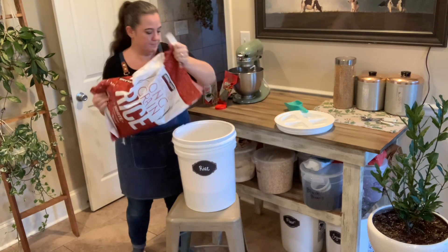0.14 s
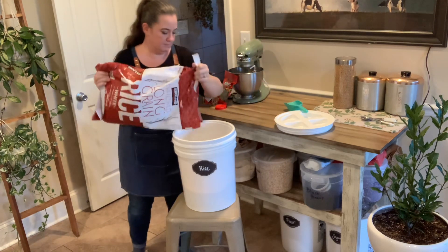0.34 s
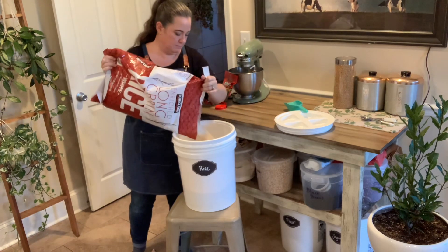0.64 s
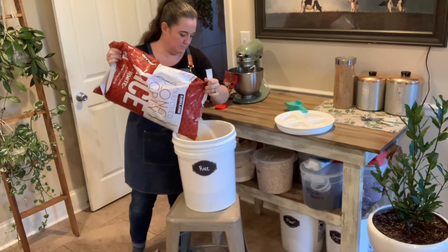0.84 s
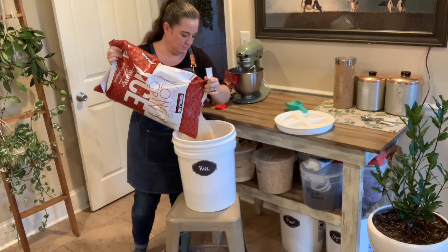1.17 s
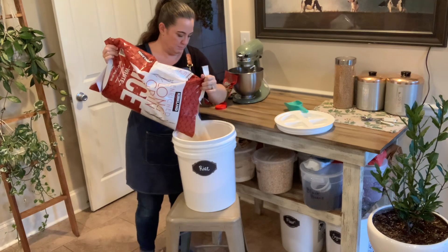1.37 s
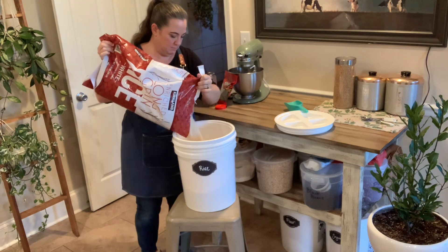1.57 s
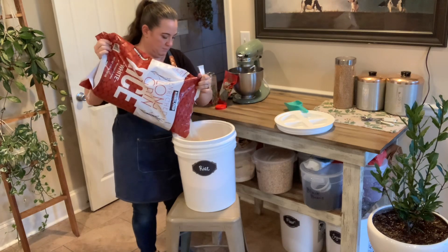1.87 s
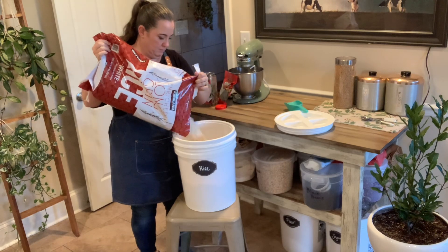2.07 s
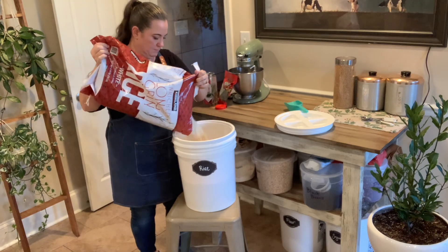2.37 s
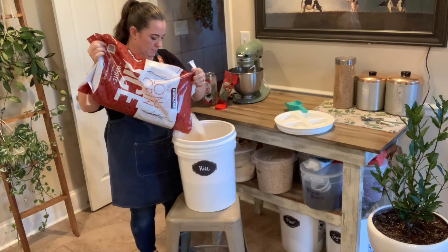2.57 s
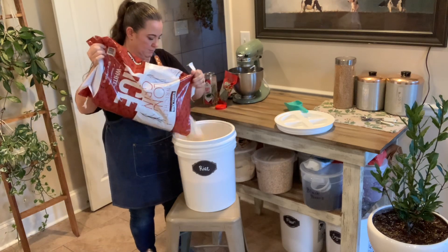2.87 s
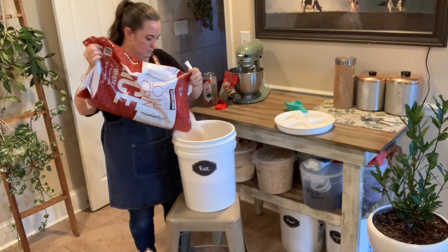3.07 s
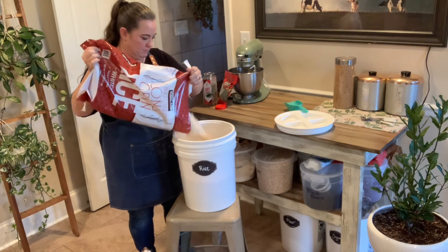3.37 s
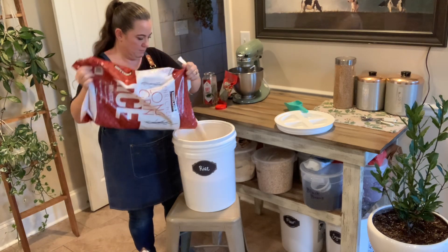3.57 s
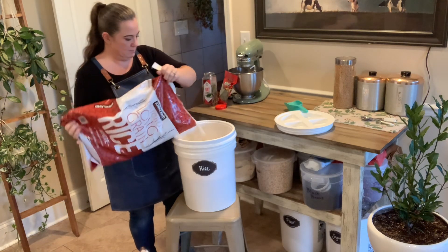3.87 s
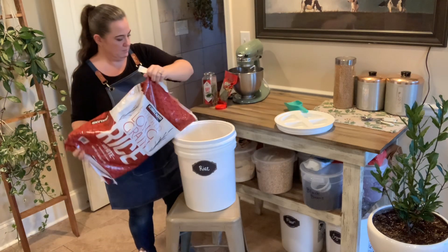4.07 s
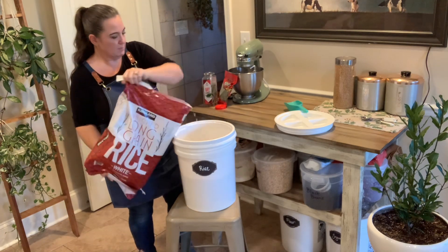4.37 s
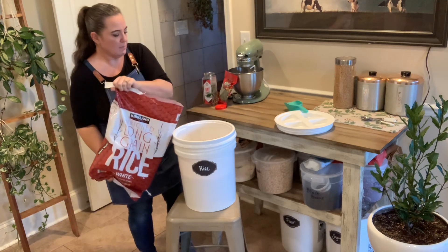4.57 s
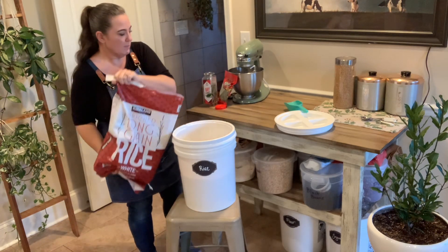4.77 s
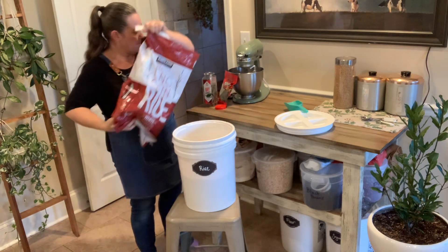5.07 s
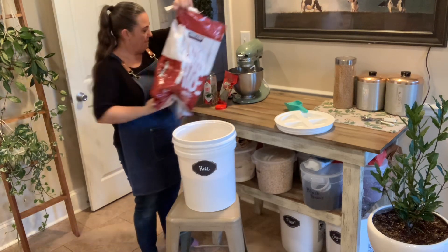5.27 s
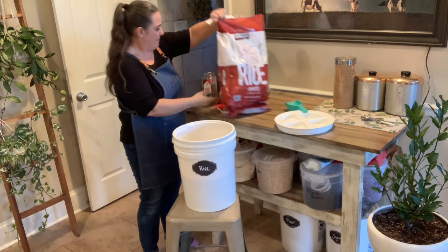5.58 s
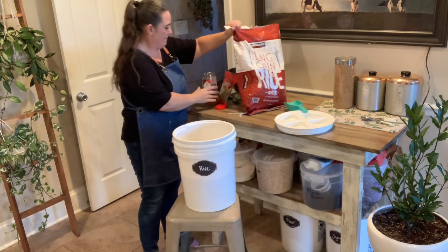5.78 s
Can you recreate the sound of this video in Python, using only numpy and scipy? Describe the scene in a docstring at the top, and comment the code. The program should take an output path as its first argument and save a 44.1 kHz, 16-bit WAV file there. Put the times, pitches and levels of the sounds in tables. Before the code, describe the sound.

In a kitchen with little echo and a steady low appliance hum, a sack of rice crunches and bumps close to the microphone. Grains patter into a plastic bucket, first as a stream, then in quick rhythmic spurts as the sack is shaken. The pouring stops, the rice slides back inside with loud crackles and snaps of the sack, and it lands with a few dull bumps.

```python
"""A rush of dry rice slides and crunches in a large woven sack, over a kitchen appliance's low hum. The sack
creases, snaps and bumps as the rice is shaken into a plastic bucket. Countless random impacts merge into noise:
grains patter on the heap, and the mass slides and slumps with every shake. Creases excite the sack's damped
modes, and the falling stream those of the bucket wall. In the stereo image the treble is nearly alike in both
channels, with a phase difference that turns with frequency."""
import sys
import numpy as np
from scipy import signal
from scipy.fft import rfft, irfft, next_fast_len
from scipy.io import wavfile

SR = 44100
rng = np.random.default_rng(int(sys.argv[2]) if len(sys.argv) > 2 else 0)


def wrap_up_sound(samples):
    """Save the sound to the file named by the first command line argument, as 16-bit audio."""
    columns = np.atleast_2d(samples).T
    # keep every value between -1 and 1, then stretch to whole-number steps
    tamed = np.clip(columns, -1, 1)
    steps = np.round(tamed * 32767).astype(np.int16)
    wavfile.write(sys.argv[1], SR, steps)


N = 261204
PADDED = next_fast_len(N + SR // 2, True)
BINS_HZ = np.arange(PADDED // 2 + 1) * SR / PADDED + 1e-3
CRUNCH_HOLD_S = .014

# rice creeping in the sack between moves: (time [s], slide level [dB], crunch level [dB])
CREEP = [(0, -29.5, -45), (.2, -37.5, -34.5), (.42, -33.5, -33), (.76, -33.5, -36.5), (1.12, -39, -45.5),
         (1.45, -46, -50), (1.66, -46.5, -50), (2.2, -44, -43.5), (2.48, -44, -39.5), (2.74, -52, -44),
         (3.45, -39, -40), (3.71, -45, -52), (4.0, -37.5, -40.5), (4.63, -35.5, -39.5), (5.0, -45.5, -38),
         (5.4, -45.5, -48.5), (5.5, -40.5, -44), (5.8, -38.5, -39), (5.92, -59, -44.5)]


def from_db(db):
    """Amplitude ratio: a factor of ten for every 20 dB."""
    return 10 ** (np.asarray(db) / 20)


def rms_one(x):
    """Normalisation to unit mean power."""
    return x / np.sqrt(np.mean(x ** 2) + 1e-20)


def level(rows, column=1):
    """Gain envelope: straight lines in dB give exponential growth and decay."""
    rows = np.array(rows)
    return from_db(np.interp(np.arange(N) / SR, rows[:, 0], rows[:, column]))


def at_hz(rows, hz, column=1):
    """Interpolation on a logarithmic frequency axis."""
    rows = np.array(rows)
    return np.interp(np.log(hz), np.log(rows[:, 0]), rows[:, column])


def drift(rate_hz):
    """Slow random modulation of unit rms: noise through two one-pole low-passes."""
    step, settle = 40, 2000
    pole = np.exp(-2 * np.pi * rate_hz * step / SR)
    noise = rng.standard_normal(N // step + settle + 2)
    slow = signal.lfilter([1], [1, -2 * pole, pole * pole], noise)[settle:]
    return np.interp(np.arange(N) / step, np.arange(len(slow)), rms_one(slow))


def grains(per_s, spread_db):
    """Shot noise: two independent Poisson streams of impacts of uneven size."""
    sizes = from_db(spread_db * np.minimum(rng.exponential(1, (2, N)), 4))
    signs = rng.choice([-1, 1], (2, N))
    return sizes * signs * (rng.random((2, N)) < per_s / SR) + 1e-9


def coloured(source, colour, patchy_db, flicker_hz):
    """Spectral shaping to unit rms, with partly correlated modulation of half-octave bands."""
    lowest, highest = colour[0][0], colour[-1][0]
    centres = lowest * 2 ** np.arange(0, np.log2(highest / lowest) + .5, .5)
    shaped = rfft(source, PADDED) * from_db(at_hz(colour, BINS_HZ))
    out, together = 0, drift(flicker_hz)
    for centre in centres:
        away = np.clip(2 * np.log2(BINS_HZ / centre), -1, 1)
        band = irfft(shaped * np.cos(np.pi / 2 * away) ** 2, PADDED)[:, :N]  # overlaps add up to one
        out = out + band * from_db(patchy_db * (.82 * together + drift(flicker_hz)))
    return rms_one(out)


def ring(clicks, hz, t60):
    """Damped resonator: a unit impulse starts a unit sine that falls 60 dB in t60 seconds."""
    r, w = from_db(-60 / (t60 * SR)), 2 * np.pi * hz / SR
    return signal.lfilter([0, np.sin(w)], [1, -2 * r * np.cos(w), r * r], clicks + 1e-18)


def surges(rows):
    """Summed power of exponential swells; each rise time and fall time spans 20 dB."""
    t = np.arange(0, N + 64, 64) / SR
    peak, rise, hold, fall, db = np.transpose(rows)[:, :, None]
    before = np.maximum((peak - t) / rise, 0)
    after = np.maximum((t - peak - hold) / fall, 0)
    power = from_db(db - 20 * (before + after)) ** 2
    return np.interp(np.arange(N) / SR, t, power.sum(axis=0))


def stirred(layer, *steady, shake_db=0, shift_db=0, lag=0, rise=.036, hold=.012):
    """Incoherent addition: a layer's steady parts and the sack's movements sum in power to one gain."""
    # shakes, about four a second: (peak time [s], fall [s], patter, slide, crunch, slump levels [dB])
    shakes = [(1.5, 0.092, -44, -38, -39.5, -43), (1.758, 0.13, -37, -35, -45, -49),
              (2.023, 0.15, -35.5, -33, -35.5, -43), (2.275, 0.25, -39.5, -34.5, -37, -43.5),
              (2.535, 0.23, -40, -32, -33.5, -39.5), (2.801, 0.23, -34.5, -30, -34.5, -36.5),
              (3.058, 0.13, -33, -29.5, -36.5, -38), (3.311, 0.24, -37.5, -34, -35, -38.5),
              (3.51, 0.078, -36, -43, -59, -66), (3.59, 0.18, -36, -39.5, -72, -81)]
    # the sack tilted, turned, lifted and set down:
    # (peak time [s], rise [s], hold [s], fall [s], patter, slide, crunch, slump levels [dB])
    shifts = [(0, .02, 0.0041, 0.21, -33.5, -37, -29, -33),
              (0.288, 0.18, 0.019, 0.36, -43.5, -35, -39, -36.5),
              (0.505, 0.14, 0.046, 0.21, -48, -38, -28.5, -35),
              (0.758, 0.037, 0.0085, 0.08, -30, -44, -36, -43),
              (0.628, .04, 0.0082, 0.034, -46, -52, -46, -32),
              (1.703, .004, .008, 0.052, -69, -41, -37, -47), (2.462, 0.04, .01, 0.036, -46, -57, -35, -44),
              (2.867, 0.021, 0.0074, 0.028, -47, -47, -29.5, -54),
              (3.124, 0.023, 0.016, 0.05, -54, -36, -33, -45),
              (3.312, 0.022, .03, .04, -39, -32.5, -49, -50),
              (3.385, 0.02, 0.014, 0.065, -56, -45, -33, -51),
              (3.81, 0.099, 0.052, 0.17, -36, -30, -25, -29.5),
              (4.153, 0.075, 0.068, 0.16, -38.5, -27.5, -23, -33),
              (4.332, 0.003, 0.012, .17, -39, -29.5, -31, -37),
              (4.701, 0.048, 0.055, 0.18, -50, -40, -36.5, -33.5),
              (4.887, 0.017, 0.008, 0.031, -56, -47, -38.5, -41),
              (4.97, .01, 0.018, 0.14, -52, -43, -42, -51),
              (5.071, 0.11, 0.0087, 0.16, -51, -43, -45, -33.5),
              (5.2095, .002, 0.005, 0.04, -46, -39, -44, -51),
              (5.285, .002, 0.005, 0.06, -50, -38, -44, -66),
              (5.456, 0.054, 0.032, 0.21, -50, -36, -34.5, -38),
              (5.532, .03, 0.0068, .04, -37, -30.5, -29.5, -43),
              (5.55, 0.008, 0.02, 0.15, -52, -32, -28, -43),
              (5.639, 0.086, 0.031, 0.16, -32.5, -28, -29, -37),
              (5.686, 0.017, 0.01, 0.14, -52, -36, -31.5, -31.5),
              (5.827, 0.051, 0.011, 0.16, -46, -35, -38, -37)]
    k = ("patter", "slide", "crunch", "slump").index(layer)
    swells = [(peak + lag, rise, hold, fall, db[k] + shake_db) for peak, fall, *db in shakes]
    swells += [(*row[:4], row[4 + k] + shift_db) for row in shifts]
    return np.sqrt(surges(swells) + sum(part ** 2 for part in steady))


def rice():
    """Granular noise: dense impacts merge into patter, hiss, sliding, crunching weave and low slumps."""
    # spectra of the five layers: (frequency [Hz], relative spectral density [dB])
    patter_colour = [(4500, -20), (6500, -5), (8500, 1), (10500, -1), (13000, -2), (16500, -3)]
    slide_colour = [(900, -13), (1500, 1), (1900, 1), (2350, -1.5), (3200, -2), (4200, -6), (6500, -37)]
    crunch_colour = [(300, -24), (520, 2), (800, 1.5), (1250, 1.5), (1700, -3), (2600, -11.5)]
    slump_colour = [(90, -4), (160, -11.5), (240, 2.5), (310, 3.5), (400, 3), (520, -5), (900, -14.5)]
    hiss_colour = [(2600, -20), (3800, -4), (4600, 0), (6000, -2), (8000, -5), (10000, -12), (13000, -24)]
    # grains falling between shakes: (time [s], level [dB])
    stream = [(0, -51), (.2, -56), (.42, -38.5), (.66, -44.5), (.692, -41), (.705, -31.5), (.8, -30),
              (1.06, -33.5), (1.15, -39.5), (1.5, -44), (1.66, -47.5), (1.9, -49.5), (2.15, -50),
              (2.45, -40.5), (2.62, -53), (2.74, -52), (2.95, -56), (3.2, -50), (3.45, -55), (3.55, -55),
              (3.72, -70), (4.1, -38), (4.3, -45), (4.7, -45), (4.9, -57), (5.1, -53), (5.45, -53),
              (5.6, -43), (5.92, -63)]
    patter = coloured(grains(12000, spread_db=3.5), patter_colour, patchy_db=1.2, flicker_hz=12)
    slide = coloured(grains(6000, spread_db=3), slide_colour, patchy_db=2, flicker_hz=27)
    crunch = coloured(grains(3000, spread_db=2), crunch_colour, patchy_db=1.3, flicker_hz=13.4)
    slump = coloured(grains(4000, spread_db=0), slump_colour, patchy_db=-.5, flicker_hz=13.3)
    hiss = coloured(grains(9000, spread_db=4), hiss_colour, patchy_db=1.75, flicker_hz=9)
    falling, sliding, folding = level(stream), level(CREEP), level(CREEP, column=2)
    patter *= stirred("patter", falling, rise=.11)  # grains leave early in a shake
    slide *= stirred("slide", sliding)
    crunch *= stirred("crunch", folding, hold=CRUNCH_HOLD_S)
    slump *= stirred("slump", folding * from_db(-8.5), lag=.029)
    hiss *= stirred("slide", falling * from_db(-6.5), sliding * from_db(-5.5),
                    shake_db=-2.5, shift_db=-5.5)
    return patter + slide + crunch + slump + hiss


def appliance():
    """Modulated tones: a hum of fixed pitch and one creeping upward, over a noise-driven resonance."""
    # hum of fixed pitch: (time [s], level [dB])
    hum = [(0, -36), (.25, -45), (1.3, -43), (1.7, -45), (1.85, -46), (2.2, -42.5), (2.75, -45.5),
           (3.5, -53), (4.1, -45), (4.6, -56), (5.0, -51), (5.5, -61), (5.92, -58)]
    # unsteady hum: (time [s], frequency [Hz], level [dB], relative level of its octave [dB])
    low_hum = [(0, 57, -56, -4), (1.1, 56, -48.5, -9.5), (1.9, 58, -57, -2.5), (2.5, 60, -47, -15),
               (3.2, 62, -49, -9), (3.5, 62.6, -51, -20), (4.3, 64, -51, -12), (5.2, 65, -49.5, -15),
               (5.92, 67, -48, -18)]
    # low rumble: (frequency [Hz], bandwidth of each resonator [Hz], level [dB])
    drone = [(46, 20, -62.5)]
    t, hum_hz = np.arange(N) / SR, 76.2
    steady = level(hum) * from_db(1.5 * drift(2.5)) * np.sin(2 * np.pi * hum_hz * t)
    pitch_hz = np.interp(t, *np.transpose(low_hum)[:2]) + 1.2 * drift(2.53)
    phase = 2 * np.pi * np.cumsum(pitch_hz) / SR
    octave = level(low_hum, column=3) * from_db(2 * drift(3.2)) * np.sin(2 * phase)
    unsteady = level(low_hum, column=2) * from_db(2 * drift(4.5)) * (np.sin(phase) + octave)
    out = np.sqrt(2) * (steady + unsteady)
    for hz, width_hz, db in drone:
        t60 = np.log(1000) / (np.pi * width_hz)
        noise = rng.standard_normal((2, N + SR))
        rumble = ring(ring(noise, hz, t60), hz, t60)[:, SR:]  # one second to settle
        out = out + from_db(db) * rms_one(rumble)
    return out


def room_tone():
    """Ambient noise: a wavering floor with most of its power at low frequencies."""
    # background spectrum: (frequency [Hz], relative spectral density [dB])
    colour = [(15, -38), (25, -22), (48, 3), (68, 1), (76, 22), (86, 8), (120, 9.5), (165, 5.5), (304, 5),
              (444, -27), (1480, -21), (3140, -27), (7000, -61)]
    return from_db(-50) * coloured(rng.standard_normal((2, N)), colour, patchy_db=2, flicker_hz=2.5)


def snaps():
    """Impulse excitation: creases ring the sack's modes, and a bright rustle follows each large one."""
    # large creases: (time [s], ring levels below 1.8, at 1.8-7, at 7-11 and above 11 kHz [dB],
    # rustle level [dB])
    creases = [(.076, -38, -26, -39, -39, -41), (.509, -20, -27, -40, -40, -44),
               (0.615, -39, -27, -31, -29, -27), (1.699, -29, -32, -50, -50, -50),
               (1.707, -32.5, -34, -50, -50, -56), (2.800, -34, -23, -36, -36, -48),
               (2.811, -55, -27, -36, -34, -42), (2.822, -27, -20, -40, -40, -46),
               (2.984, -29, -38, -50, -61, -54), (3.058, -30, -28, -40, -36, -42),
               (3.121, -27, -26, -44, -44, -50), (3.31, -34, -29, -40, -40, -44),
               (3.325, -34, -25, -36, -35, -46), (3.382, -26, -33, -36, -38, -50),
               (3.727, -24, -31, -41, -37, -42), (3.759, -22, -41, -36, -36, -46),
               (3.766, -36, -27, -34, -34, -35), (3.789, -21, -22, -13, -32, -31),
               (4.330, -21, -14, -12, -18, -32), (4.3378, -37, -24, -18, -16, -36),
               (4.361, -34, -21, -22, -16, -43), (4.3788, -44, -28, -18, -17, -33),
               (4.464, -44, -27, -26, -38, -38), (4.9487, -43, -28, -20, -37, -36),
               (4.989, -30, -34, -38, -40, -51), (5.0565, -46, -43, -23, -40, -35),
               (5.094, -33, -29, -42, -44, -39), (5.2075, -35, -25, -20, -25, -37),
               (5.2822, -33, -25, -36, -38, -46), (5.2865, -34, -33, -31, -33, -43),
               (5.2905, -32, -40, -53, -53, -48), (5.381, -39, -34, -26, -27, -42),
               (5.444, -42, -34, -44, -46, -51), (5.470, -33, -26, -42, -40, -42),
               (5.554, -17, -20, -44, -46, -44), (5.594, -25, -24, -36, -34, -42),
               (5.8335, -26, -25, -36, -27, -36)]
    # modes of the sack: (frequency [Hz], relative level [dB], decay time t60 [s])
    sack_modes = [(850, 0, .016), (1400, -2, .01), (2200, -2, .006), (3800, 0, .004), (5400, 0, .003),
                  (8300, -2, .002), (10200, 0, .002), (12500, 0, .002), (14500, 0, .002)]
    band_edges_hz, rustle_t60_s = (1800, 7000, 11000), .055
    times, *band_db, rustle_db = np.transpose(creases)
    at = np.round(times * SR).astype(int)
    scatter_db = rng.normal(0, 1.5, (len(at), len(sack_modes)))
    crunching = stirred("crunch", level(CREEP, column=2), hold=CRUNCH_HOLD_S)
    crinkles = from_db(-5.5) * grains(90, spread_db=3)[0] * crunching  # small creases
    clicks, onsets = np.zeros(N), np.zeros(N)
    for k, (hz, mode_db, t60) in enumerate(sack_modes):
        band = np.searchsorted(band_edges_hz, hz)
        struck = crinkles * from_db(mode_db) * min(1, 3000 / hz)
        struck[at] += from_db(mode_db + scatter_db[:, k] + band_db[band])
        clicks += ring(struck, hz, t60) * (-1) ** k
    onsets[at] = from_db(rustle_db)
    dying = signal.lfilter([1], [1, -from_db(-60 / (rustle_t60_s * SR))], onsets + 1e-18)
    high_pass = signal.butter(1, 2500, "high", fs=SR, output="sos")
    rustle = signal.sosfilt(high_pass, grains(15000, spread_db=2))
    return clicks + dying * rms_one(rustle)


def bumps():
    """Damped free vibration: the loaded sack meets body or table, and the soft contact gives a thud."""
    # contacts: (time [s], level before the low-pass [dB], frequency [Hz], decay time t60 [s])
    contacts = [(0.271, -28, 290, 0.093), (.318, -26, 293, .1), (.522, -31, 318, 0.3),
                (0.619, -35, 315, .1), (2.86, -28.5, 400, 0.21), (3.81, -27, 500, 0.035),
                (3.819, -40, 165, 0.23), (3.84, -40, 240, .2), (4.149, -27, 415, 0.081),
                (4.16, -10, 1200, 0.15), (4.195, -15, 1120, .08), (4.7, -35, 245, 0.07),
                (5.068, -37, 365, 0.05), (5.5, -40, 160, .15), (5.553, -16.5, 975, 0.21),
                (5.691, -29.5, 200, .2), (5.566, -26.5, 380, 0.088), (5.704, -17.5, 340, 0.029),
                (5.84, -29, 345, 0.065)]
    out, t = np.zeros(N + SR), np.arange(SR // 2) / SR
    for start, db, hz, t60 in contacts:
        at = round(start * SR)
        out[at:at + len(t)] += from_db(db - 60 * t / t60) * np.sin(2 * np.pi * hz * t)
    return signal.sosfilt(signal.butter(2, 600, fs=SR, output="sos"), out[:N])


def bucket():
    """Random forcing: an uneven stream of grain impacts keeps the wall's modes ringing."""
    # the stream drumming on the wall: (time [s], level [dB])
    drumming = [(.68, -71), (.76, -37), (.85, -35), (1.0, -39), (1.13, -42.5), (1.2, -51), (1.4, -54),
                (3.3, -57), (3.45, -40.5), (3.65, -48), (3.8, -91)]
    # modes of the wall: (frequency [Hz], relative level [dB], decay time t60 [s])
    wall_modes = [(1346, 0, 0.015), (1720, -3, .03), (2890, -3, .07), (2980, -3, .08), (3045, 0, .1),
                  (3110, -2, .09), (3205, -5, .07), (3410, -6, .06), (3570, -7, .07)]
    impacts = grains(1500, spread_db=3.5) * from_db(2.2 * drift(25))
    ringing = sum(from_db(db) * ring(impacts, hz, t60) for hz, db, t60 in wall_modes)
    return level(drumming) * rms_one(ringing)


def kitchen(direct):
    """Reverberation: dense, dull reflections decay exponentially, independently on each path."""
    t60_s, first_echo_s, wall_cut_hz = .16, .004, 5000
    t = np.arange(SR // 3) / SR
    echoes = rng.standard_normal((2, len(t))) * from_db(-60 * t / t60_s) * (t > first_echo_s)
    echoes *= from_db(-7) / np.sqrt(np.sum(echoes ** 2, axis=1, keepdims=True))
    dull = 1 / (1 + 1j * BINS_HZ / wall_cut_hz)
    return direct + irfft(rfft(direct, PADDED) * rfft(echoes, PADDED) * dull, PADDED)[:, :N]


def stereo_image(pair):
    """Partial coherence: the right channel carries the left's sound, phase-shifted, plus diffuse sound."""
    # the stereo image: (frequency [Hz], coherence [0-1], right phase lead [rad], left minus right [dB])
    relation = [(60, .985, 0, .5), (150, .88, 0, 1.5), (280, .75, .2, 3.5), (550, .2, .5, .5),
                (1140, .33, .1, -1.5), (2300, .2, 0, -1.8), (3700, .36, 0, -1.5), (4900, .2, -.8, -1),
                (6200, .4, -1.64, -.8), (7300, .72, -2.55, -.4), (7750, .9998, -3.1416, 0),
                (10000, .9998, -3.1416, 0), (10600, .75, -3.8, -.2), (11700, .66, -5, 0),
                (12300, .78, -5.8, 0), (12700, .9995, -6.283, 0), (16000, .9995, -6.283, 0)]
    coherence, phase, balance_db = (at_hz(relation, BINS_HZ, column=k) for k in (1, 2, 3))
    left, diffuse = rfft(pair, PADDED)
    right = coherence * left * np.exp(1j * phase) + np.sqrt(1 - coherence ** 2) * diffuse
    balanced = np.array([left * from_db(balance_db / 2), right * from_db(-balance_db / 2)])
    return irfft(balanced, PADDED)[:, :N]


def scene():
    """Superposition: the reverberant pouring, the hum and the room tone add in the two channels."""
    air = room_tone()
    pouring = rice() + bucket() + snaps() + bumps()
    return stereo_image(kitchen(pouring) + appliance() + air)


def record(dry):
    """Band limiting: a steep low-pass removes the highest treble."""
    stopband_hz = 16250
    return signal.sosfilt(signal.cheby2(14, 60, stopband_hz, fs=SR, output="sos"), dry)


dry = scene()
out = record(dry)
wrap_up_sound(out)
```